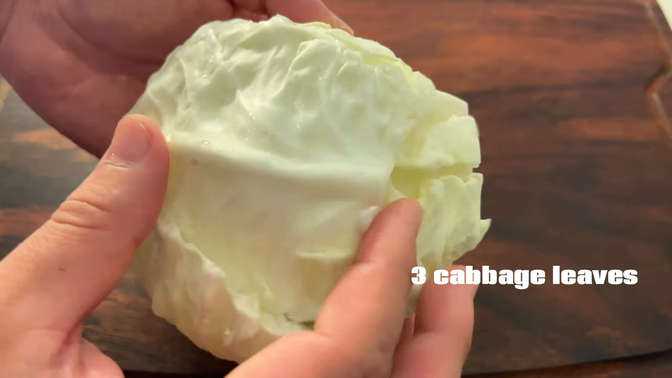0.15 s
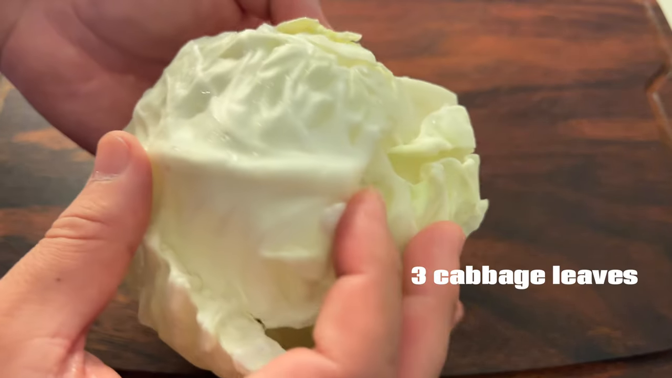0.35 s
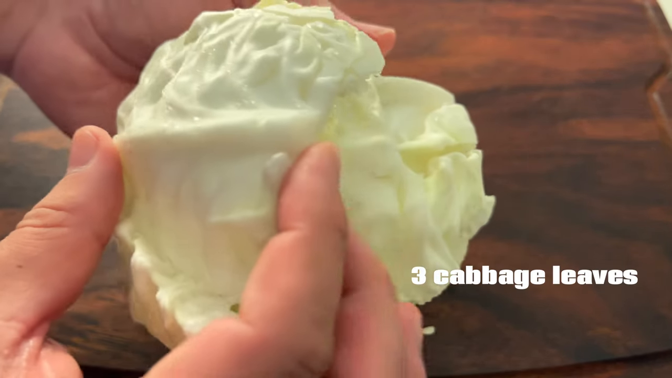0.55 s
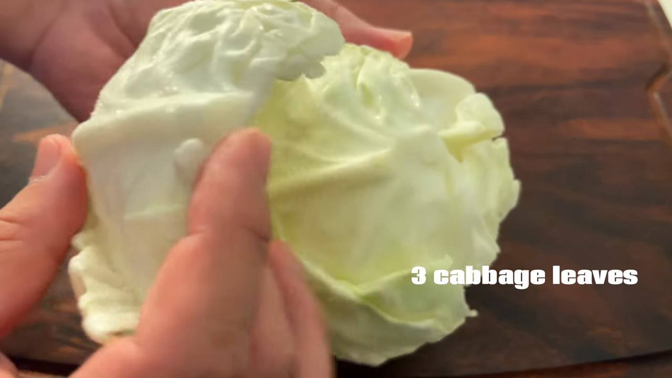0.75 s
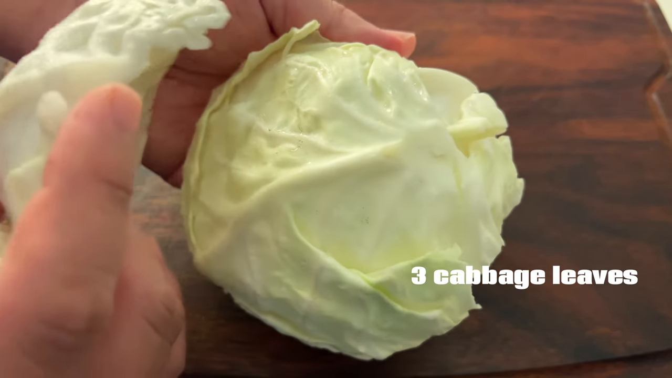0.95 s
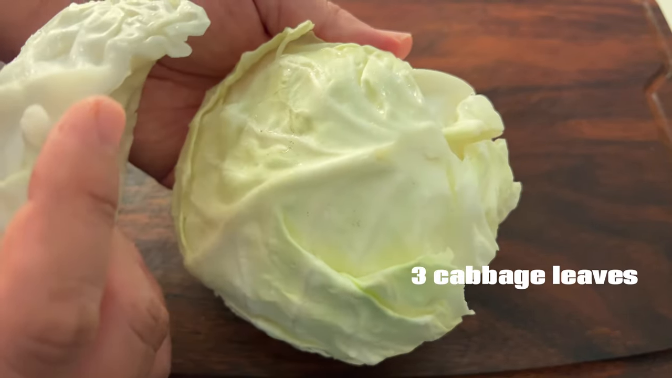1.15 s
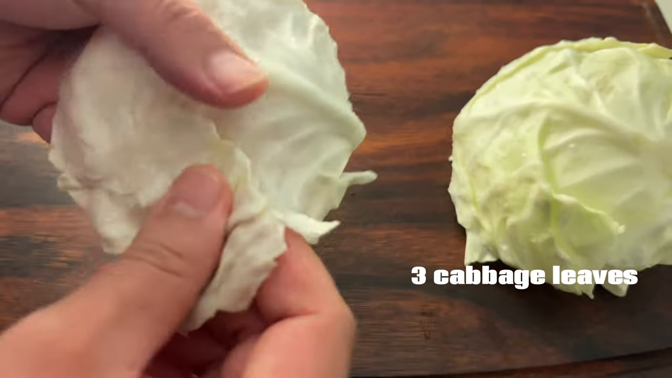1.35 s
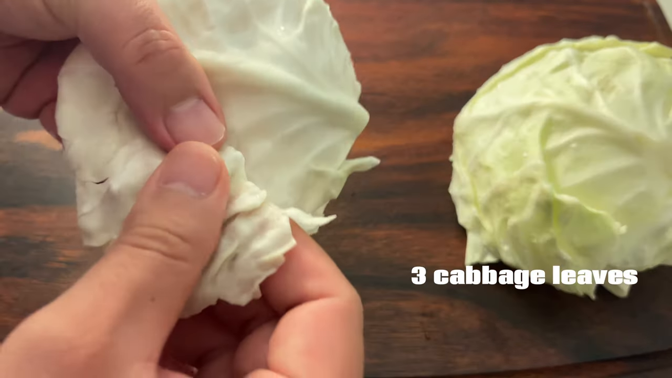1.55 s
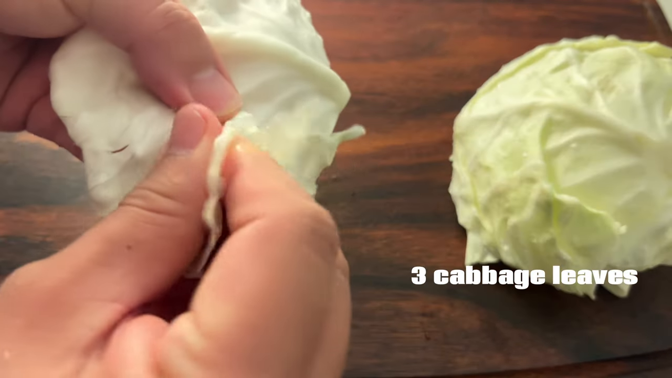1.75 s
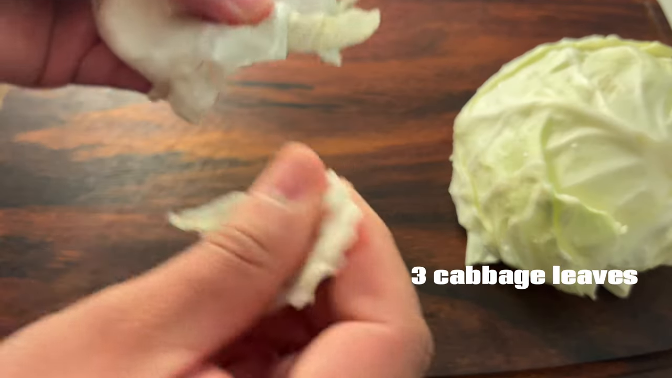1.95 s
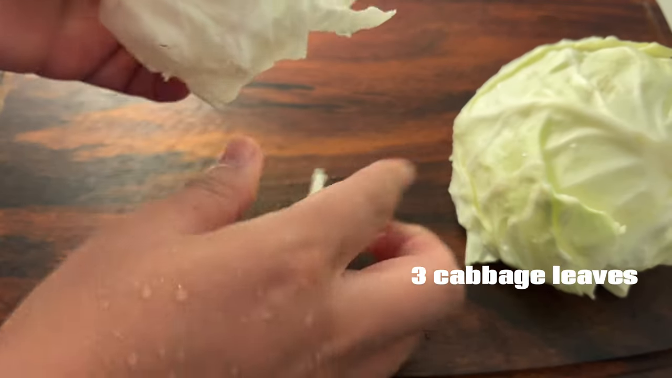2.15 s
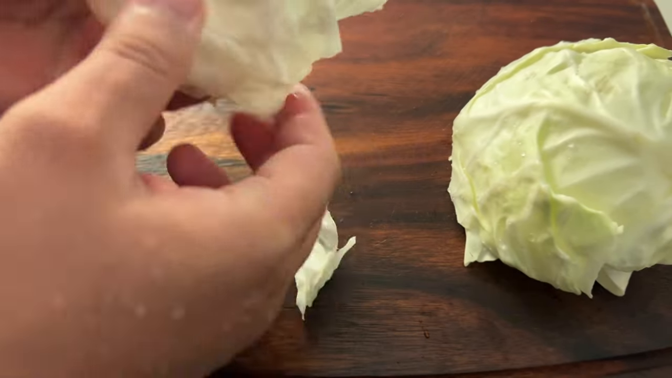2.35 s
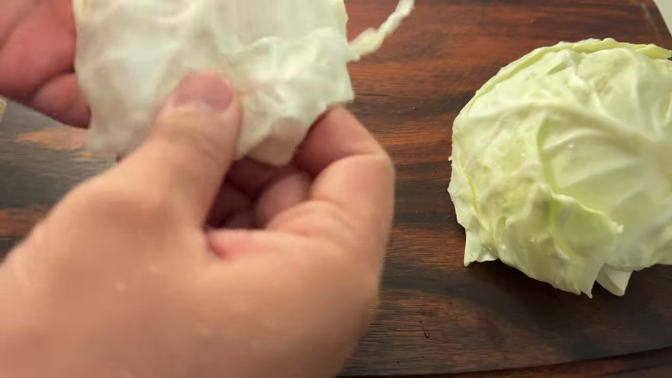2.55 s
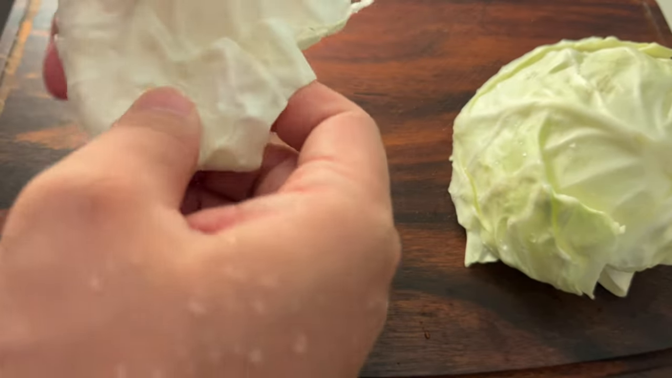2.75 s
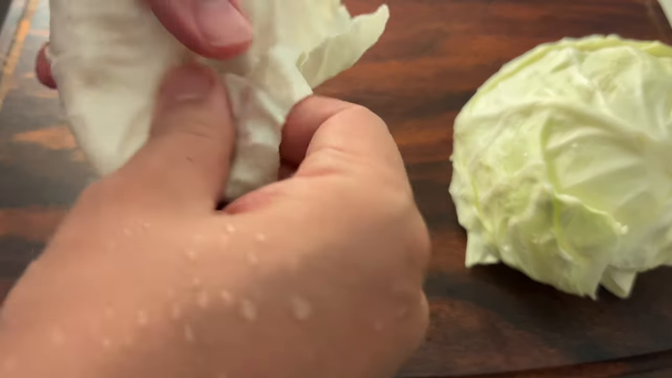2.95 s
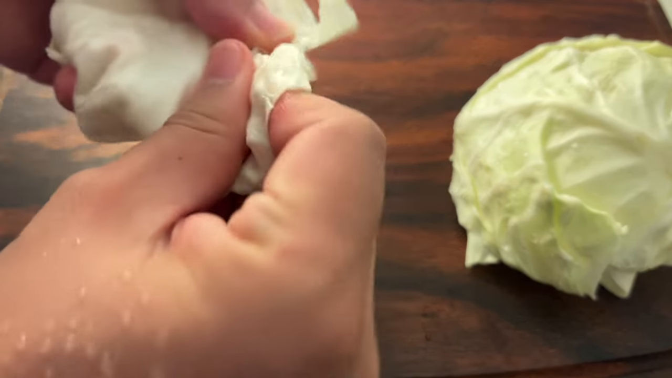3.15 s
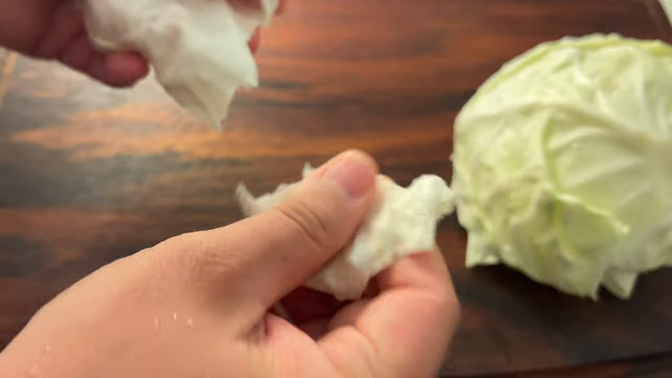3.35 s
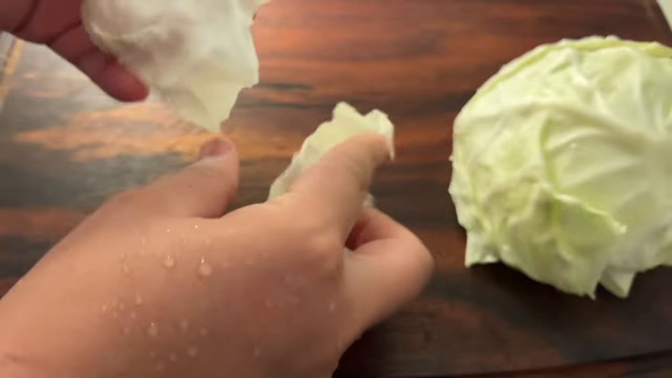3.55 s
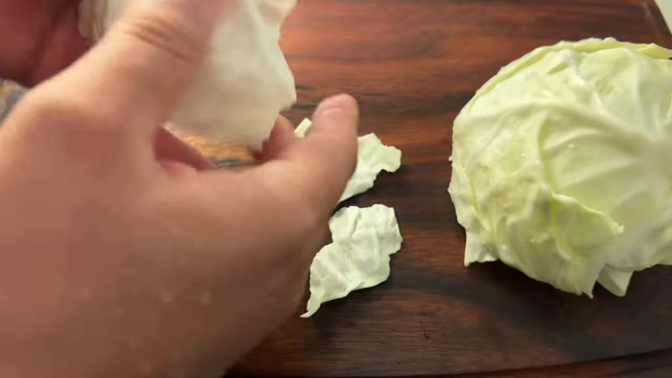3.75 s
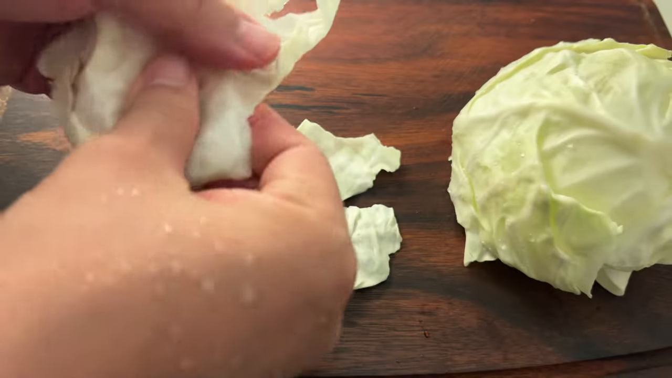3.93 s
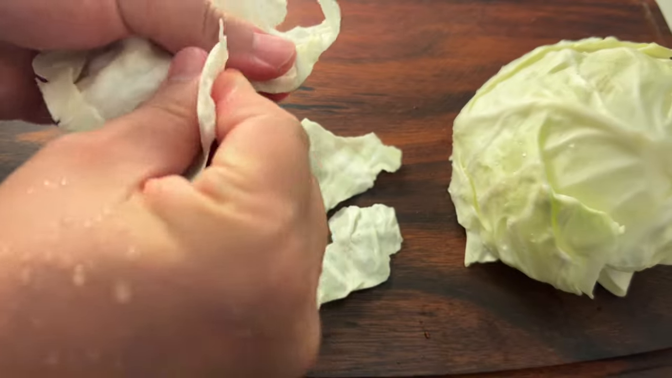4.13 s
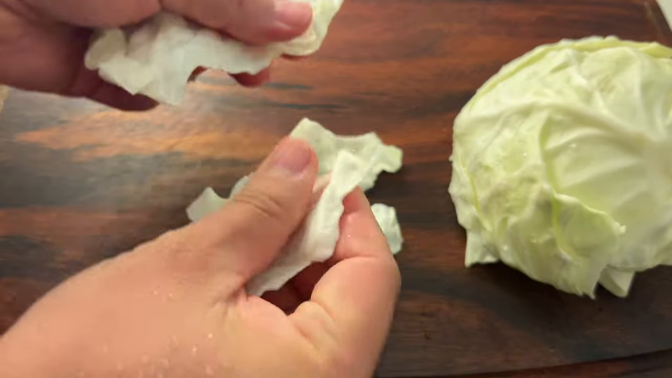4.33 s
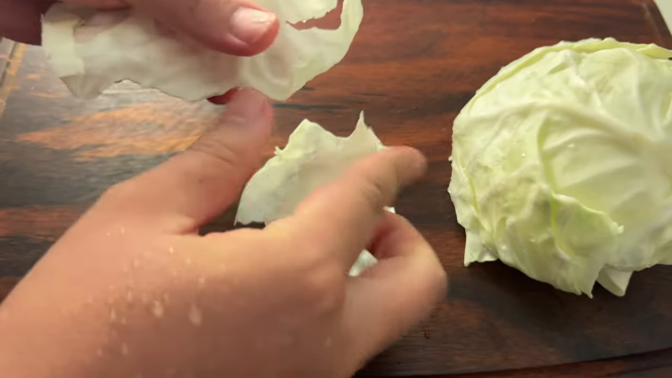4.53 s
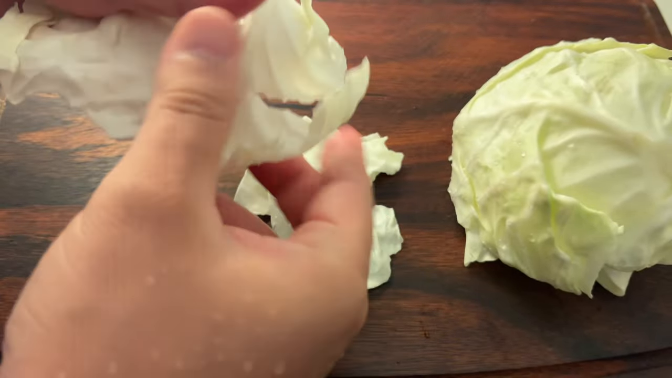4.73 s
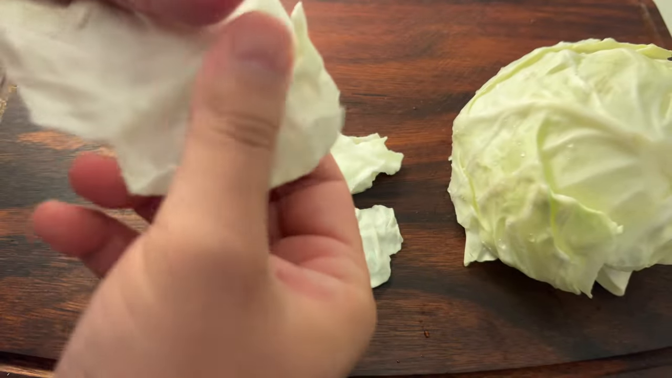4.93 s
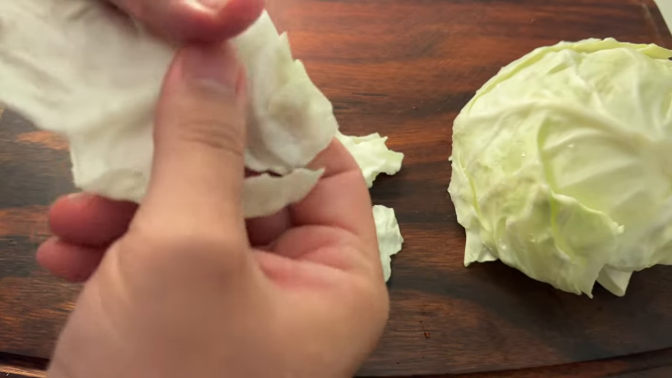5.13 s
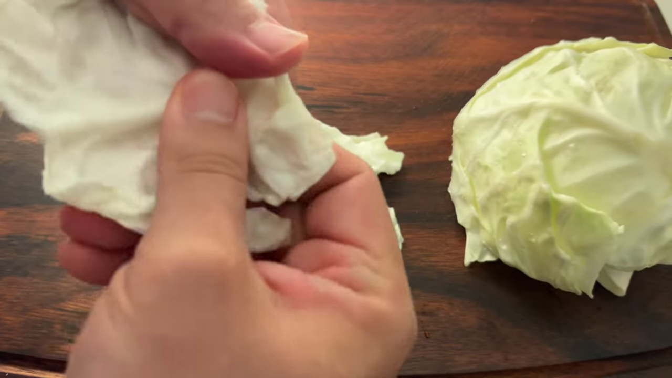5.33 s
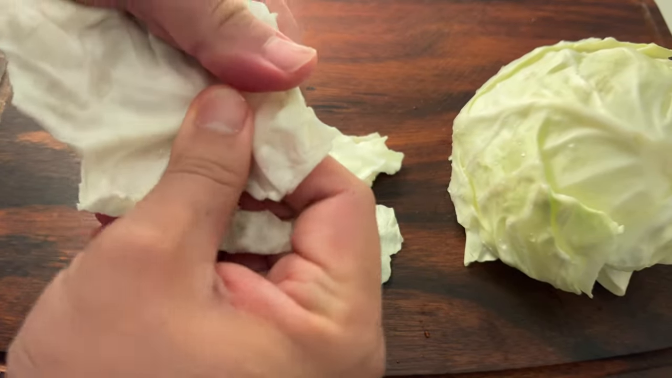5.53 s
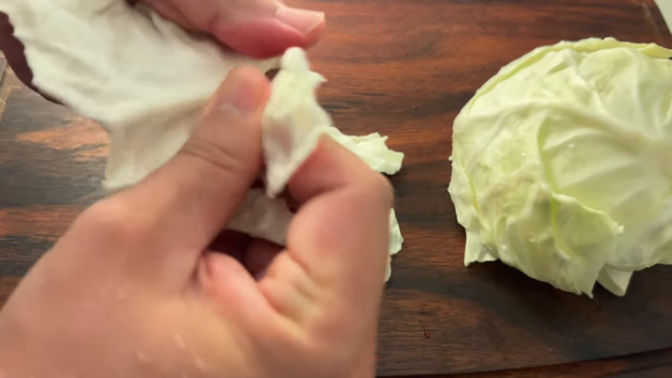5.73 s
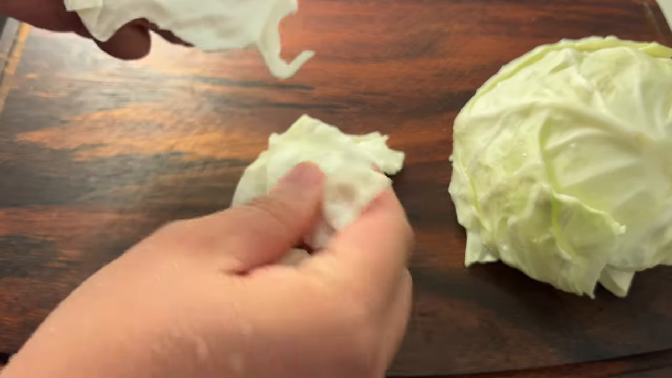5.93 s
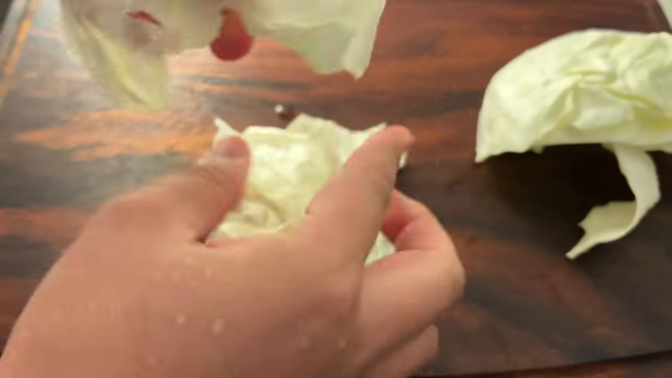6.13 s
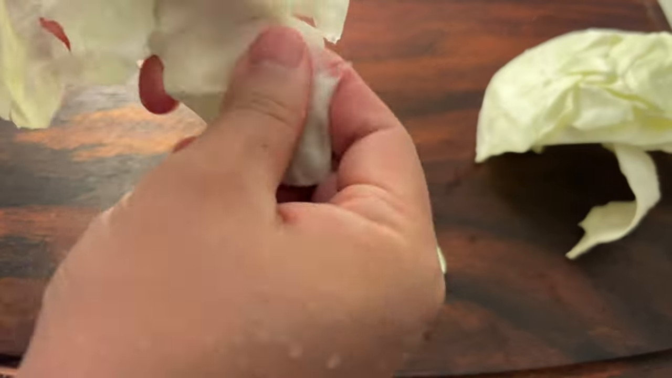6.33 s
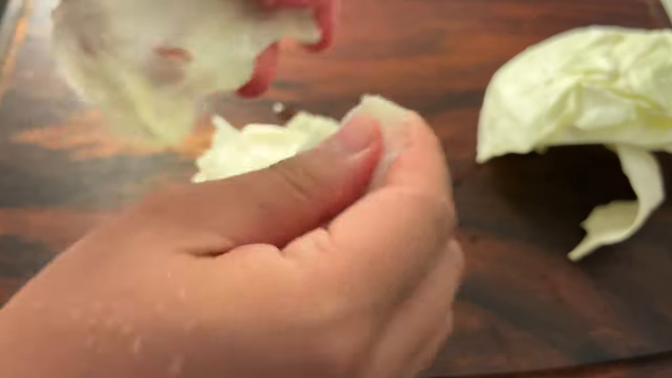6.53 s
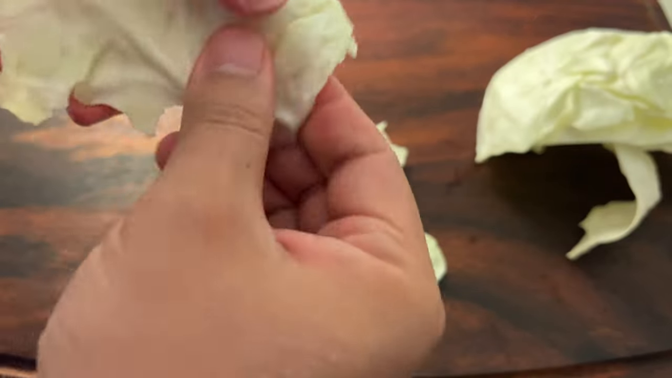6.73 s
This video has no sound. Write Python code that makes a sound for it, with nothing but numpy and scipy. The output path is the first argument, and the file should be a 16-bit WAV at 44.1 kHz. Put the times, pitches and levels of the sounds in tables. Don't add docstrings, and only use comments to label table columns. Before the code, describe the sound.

Irregular bursts of fresh leaf tearing: gentle peeling pops and a tiny squeak, a near pause, then dense crunchy rips, loud brittle snaps and dry ticks, with soft finger rustle between. Late on come two very sharp cracks, one with a dull knock on wood. Recorded very near in stereo by a phone, with a short kitchen echo, low room noise and a faint far motor drone.

```python
import sys
import numpy as np
from scipy import signal
from scipy.fft import rfft, irfft
from scipy.io import wavfile
from scipy.ndimage import uniform_filter1d

SR = 44100
rng = np.random.default_rng(int(sys.argv[2]) if len(sys.argv) > 2 else 0)


def gain_from_db(level_db):
    decades = np.asarray(level_db, float) / 20
    return 10 ** decades


def log_audio(samples):
    frames = np.atleast_2d(samples).T
    limited = np.clip(frames, -1, 1)
    pcm = np.round(limited * 32767).astype(np.int16)
    wavfile.write(sys.argv[1], SR, pcm)


N = 298998


def evened(x):
    return x / np.sqrt(np.mean(x ** 2) + 1e-20)


def read(points, hz):
    f, value = np.transpose(points)
    return np.interp(np.log(hz + 1), np.log(f + 1), value)


def curves(rows):
    s, *columns = np.transpose(rows)
    return [np.interp(np.arange(N) / SR, s, column) for column in columns]


def add(mix, s, sound):
    part = mix[round(s * SR):][:len(sound)]
    part += sound[:len(part)]


def band(x, lo_hz, hi_hz):
    sos = signal.butter(3, [lo_hz, hi_hz], "bandpass", fs=SR, output="sos")
    return signal.sosfilt(sos, x) * np.sqrt(SR / 2 / (hi_hz - lo_hz))


def house():
    # f/Hz, level/dB per Hz
    colour = [(35, -21), (52, 0.5), (110, -3), (200, -9), (400, -13), (950, -9.5), (1500, -16), (2000, -23),
              (3000, -32), (6000, -41.5), (9000, -48.5), (12900, -45.5), (13600, -85.5)]
    # f/Hz, likeness/-1 to 1
    likeness = [(60, 1), (240, 0.58), (950, -0.16), (3770, -0.036), (15000, 1)]
    # t/s, rumble level/dB, murmur level/dB
    loudness = [(0, -73.5, -65.5), (.5, -67, -56), (.85, -71.5, -61), (1.3, -67.5, -60), (1.36, -61, -57.5),
                (2.3, -65.5, -59), (3.2, -64.5, -53.5), (3.55, -66, -62.5), (5.7, -67.5, -62),
                (6.05, -73.5, -64.5), (6.78, -68.5, -65)]
    frames, hz = N // 512 + 5, np.fft.rfftfreq(2048, 1 / SR)
    a, b, c, d, patches = rng.standard_normal((frames, 1025, 5)).T
    patches = evened(uniform_filter1d(uniform_filter1d(patches, 14, 0), 8, 1))
    same = np.clip(read(likeness, hz), -1, 1)[:, None]
    left = a + 1j * b
    right = same * left + np.sqrt(1 - same ** 2) * (c + 1j * d)
    spectrum = np.array([left, right]) * gain_from_db(read(colour, hz)[:, None] + 1.9 * patches)
    rumble_share = 1 / (1 + (hz[:, None] / 130) ** 4)
    rumble, murmur = (evened(signal.istft(spectrum * share, nperseg=2048, noverlap=1536)[1][:, :N])
                      for share in (rumble_share, 1 - rumble_share))
    rumble_db, murmur_db = curves(loudness)
    return rumble * gain_from_db(rumble_db + 7.0) + murmur * gain_from_db(murmur_db - 1.5)


def strokes():
    # t/s, hold/s, crackle level/dB, low rustle over it/dB, fizz over it/dB
    tears = [(.21, 0.025, -48, -2, -6), (.39, 0.0049, -43, 1, -14), (.52, 0.0041, -45.5, -11, -15),
             (1.355, 0.045, -56, 4, -9), (1.664, 0.1, -52, -0.5, -25), (1.76, 0.04, -40, -11.5, -0.5),
             (1.83, 0.028, -39, -9.5, -15), (2.445, 0.021, -51, -5, 1.5), (2.56, .012, -47, -2.5, -5),
             (2.985, 0.07, -36.5, -11.5, -7), (3.1, 0.16, -38, -12, -6.5), (3.38, 0.02, -46, -6, 2.5),
             (4.0, 0.12, -40.5, -7, -3), (4.16, 0.082, -38.5, -5, -4), (4.835, 0.005, -58.5, 9.5, 1.5),
             (5.055, 0.0097, -52.5, -17, -21), (5.243, 0.17, -50, -24, -5), (5.325, 0.011, -39, -4.5, -1),
             (5.63, 0.018, -38.5, -6.5, -9), (5.765, 0.019, -41.5, -8, -5), (6.095, 0.012, -70.5, 8, -2.5),
             (6.585, 0.004, -57, -3, -22.5)]
    # t/s, hold/s, crackle level/dB, low rustle over it/dB, fizz over it/dB
    rubs = [(.02, 0.25, -84, 15, -11), (.6, 0.23, -60.5, 8.5, -13), (2.12, 0.019, -66.5, 4, -13),
            (2.67, 0.69, -55, -3, -17), (3.66, 0.01, -65.5, 7, -21), (3.84, 0.02, -61, 0, -16),
            (3.95, .03, -56, 3, -8), (4.4, 0.034, -61.5, -6.5, -6), (4.93, 0.1, -65, -1, -10),
            (5.44, 0.12, -61, -21, 5), (5.88, 0.11, -64.5, 0.5, -12), (6.4, 0.021, -59.5, 1.5, -10),
            (6.74, .04, -60, 1.5, -25)]
    t, power = np.arange(0, N / SR + .002, .001), 1e-14
    for rows, rise, fall in [(tears, 1301.5, 194), (rubs, 160, 97.5)]:
        s, hold, db, low, fizz = np.transpose(rows)[..., None]
        db = db - rise * np.maximum(s - t, 0) - fall * np.maximum(t - s - hold, 0)
        power = power + (gain_from_db([db, db + low, db + fizz]) ** 2).sum(axis=1)
    return [np.interp(np.arange(N) / SR, t, 10 * np.log10(p)) for p in power]


def crackle():
    db, low_db, fizz_db = strokes()
    low_db = low_db - 2.1 * np.clip((-53.5 - low_db) / 9, 0, 1)
    clumps = gain_from_db(1.6 * evened(uniform_filter1d(rng.standard_normal(N), 450)))
    out = np.zeros(N)
    layers = [(low_db - 1.0, 500, 2500, 2200), (db, 2300, 8000, 3200), (fizz_db, 8000, 16000, 2600)]
    for level_db, lo_hz, hi_hz, per_s in layers:
        sizes = gain_from_db(3.6 * np.minimum(rng.exponential(1, N), 4.5))
        clicks = sizes * (rng.random(N) < per_s / SR)
        clicks = clicks * rng.choice([-1., 1.], N) * clumps
        out += gain_from_db(level_db - 3.5) * evened(band(clicks, lo_hz, hi_hz))
    return out


def patchy(x, patchy_db):
    z = signal.stft(x, nperseg=256)[2]
    patches = rng.standard_normal(z.shape[::-1]).T
    patches = evened(uniform_filter1d(uniform_filter1d(patches, 5, 0), 14, 1))
    return signal.istft(z * gain_from_db(patchy_db * patches), nperseg=256)[1][:N]


def veins():
    # t/s, peak level/dB, centre f/Hz, decay/ms
    cores = [(1.7555, -23.5, 6900, 12), (2.836, -45, 7960, 2.8), (3.004, -26.5, 1750, 22),
             (3.976, -30.5, 910, 3.4), (4.002, -8, 7900, 2.2), (4.152, -35, 4400, 2.5),
             (4.21, -28.5, 3250, 6.8), (4.785, -54.5, 4520, 38), (5.301, -37, 2500, 3.07),
             (5.3152, -10.5, 7000, 7.3), (5.317, -15.5, 4630, 4.7), (5.325, -28.5, 6100, 56),
             (5.172, -38, 6100, 23), (5.3165, -25, 1600, 12), (5.62, -12.5, 7100, 3.5),
             (5.62, -16, 12600, 4.4), (5.626, -35, 7600, 35), (4.0022, -17.5, 4420, 2.3),
             (5.6205, -24, 1400, 4.9), (6.447, -33.5, 5560, 16), (6.4915, -40, 4770, 14),
             (6.7605, -19.5, 5400, 4.5), (4.828, -44.5, 1960, 21), (6.399, -45, 1890, 14),
             (.381, -30, 2800, 3), (1.748, -33, 900, 5), (5.318, -35, 650, 9), (6.7605, -29, 14000, 3),
             (5.62, -24, 15000, 2.5), (.168, -54, 5000, 20)]
    # t/s, peak level/dB, centre f/Hz
    pops = [(0.1695, -53, 1500), (0.3233, -50, 1500), (0.4472, -48, 1500), (0.743, -50, 1500),
            (0.8547, -58, 1900), (0.946, -58, 1500), (1.5366, -57, 1900), (1.5417, -58, 1900),
            (1.7127, -44, 2300), (1.8797, -34, 2800), (1.8888, -36, 2800), (1.9215, -41, 4100),
            (2.1711, -59, 1500), (2.401, -48, 2300), (2.411, -49, 2800), (2.4172, -52, 1900),
            (2.8498, -41, 4100), (2.956, -41, 4100), (2.9623, -41, 4100), (2.9742, -20.5, 4080),
            (2.9835, -27, 4070), (3.129, -36, 2300), (3.1877, -29, 4100), (3.2975, -36, 4090),
            (3.3725, -29, 2800), (3.6194, -51, 3400), (3.7863, -55, 2250), (3.8156, -53, 1510),
            (3.82, -51, 1500), (3.8593, -57, 3370), (3.9846, -28, 1840), (4.075, -40, 4100),
            (4.1047, -35, 4100), (4.1305, -33, 4100), (4.1667, -26, 4100), (4.2247, -24, 3400),
            (4.3528, -54, 3400), (4.442, -45, 3380), (4.6535, -51.5, 2330), (4.994, -50, 4100),
            (5.755, -33, 2500), (5.912, -62, 1900), (5.943, -58, 1890), (6.0959, -47, 2320),
            (6.3996, -38.5, 1910), (6.4907, -21.5, 4500), (6.503, -21, 4700), (6.5552, -35, 3400),
            (6.6963, -50.5, 1920), (6.7062, -52, 1930),
            (0.216, -43, 7500), (0.3673, -34, 7340), (0.4337, -37, 7600), (1.4344, -47, 5000),
             (1.6642, -30, 4930), (1.6905, -42, 5000), (1.7563, -26, 6000), (1.837, -28, 5000),
             (1.8426, -35, 7500), (1.9764, -33.5, 9000), (2.4501, -43, 7500), (2.5578, -33, 7600),
             (2.6394, -45, 4960), (2.6638, -56, 5000), (2.8162, -53, 7550), (2.8273, -50, 4990),
             (2.8559, -34, 12000), (2.8613, -35, 7500), (2.9056, -37.5, 8950), (3.0389, -32, 7500),
             (3.0644, -34, 9000), (3.158, -31, 12000), (3.3958, -29, 12000), (3.4072, -35, 7500),
             (3.455, -31, 12100), (3.913, -51, 5000), (4.1761, -35, 5000), (4.2612, -25, 6300),
             (4.282, -25, 6100), (4.3232, -44, 7500), (4.375, -53, 11800), (4.393, -55, 6100),
             (4.4608, -41, 12000), (4.4716, -44, 7500), (4.77, -54, 5020), (4.8119, -52, 8500),
             (4.909, -49, 5030), (4.9446, -54, 5030), (5.001, -48, 5000), (5.1466, -41, 7460),
             (5.273, -35, 6100), (5.2886, -38, 9000), (5.4168, -40, 5000), (5.4293, -36, 7400),
             (5.5438, -44, 5000), (5.5522, -47, 6100), (5.5804, -49, 7500), (5.5913, -55, 7500),
             (5.755, -27, 7700), (5.816, -29, 9000), (5.8592, -52, 6100), (6.0044, -31, 8900),
             (6.0741, -51, 7500), (6.1075, -50.5, 12000), (6.3902, -36.5, 11780), (6.4368, -22, 8900),
             (6.4545, -27, 5600), (6.5958, -41, 7450)]
    tick_ms, spread = 2, 1.367
    t, out = np.arange(1500) / SR, np.zeros((2, N))
    rows = cores + [(*row, tick_ms) for row in pops]
    for (s, db, hz, ms), noise in zip(rows, rng.standard_normal((len(rows), 2, 1500))):
        shape = (1 - np.exp(-t / (ms * .00006))) * gain_from_db(-60 * t / (ms * 0.0045))
        burst = band(noise * shape, hz / spread, min(hz * spread, 16000))
        burst = burst / abs(burst).max(-1, keepdims=True) * gain_from_db(db + 1.5)
        add(out[0], s, burst[0])
        add(out[1], s, burst[1])
    return out + gain_from_db(-8.5) * room(out[0])


def snaps():
    # t/s, peak level/dB, thickness/dB, decay/ms
    stalk = [(0.2215, -39, 3, 4), (0.3813, -33, -2.5, 4.9), (0.4032, -41.5, 5.5, 3), (0.6385, -48.5, 4, 14),
             (0.659, -39, 0, 5.9), (1.349, -49.5, 13.5, 11), (1.662, -35, -4.5, 4.5), (1.7662, -36, 4, 3.1),
             (1.8004, -38.5, 2.5, 5.7), (1.811, -32, 2, 3), (2.5404, -38, 1, 5.5), (2.557, -49.5, 5.5, 17),
             (2.7, -46, 2, 9), (2.7582, -50.5, 10, 2.5), (2.989, -28.5, -6.5, 5), (3.651, -60, 13, 5.3),
             (3.915, -42, -2, 95), (3.9761, -20.5, -6.5, 1.9), (4.0019, -9, -18.5, 2.2),
             (4.7755, -53.5, 2, 13), (4.825, -44, 0, 14.5), (4.861, -60, 18, 1.8), (5.2428, -42.5, -9, 4.8),
             (5.7703, -23, -17, 0.9), (5.8025, -29.5, -16, 3.9), (6.0803, -48, -8, 12.7),
             (6.447, -32, -2.5, 12), (6.697, -63, 13, 9.5), (6.76, -27.5, -10, 2.7)]
    # t/s, peak level/dB, thickness/dB, decay/ms
    ribs = [(0.358, -45.5, 1, 20), (0.505, -40.5, 1, 8.1), (0.8763, -42.5, 3, 8.6), (1.7468, -19.5, -4, 4),
            (1.835, -43, 0, 4.9), (1.878, -34, -8, 4), (1.9217, -43, -21, 2), (2.843, -40.5, -8, 5.4),
            (2.9735, -28.5, -1.5, 2.6), (3.002, -23, -1, 6), (3.0376, -38, -2, 12), (3.047, -27.5, -9, 21),
            (3.128, -42, -19, 5.6), (3.4052, -46, 3, 6.7), (4.101, -36, 2.5, 17), (4.1588, -25, -0.5, 1.5),
            (4.1995, -30, -2, 9), (4.2375, -20, -6.5, 3), (4.2709, -28.5, -6, 5), (4.2812, -39, -7, 6.2),
            (4.4112, -46, -15, 5.2), (4.4434, -49, -7.5, 20), (4.914, -45.5, -14, 9.2),
            (5.0559, -42.5, -4, 12), (5.294, -33, -8, 4.9), (5.316, -20, -2.5, 4.7), (5.429, -49, -12, 3.3),
            (5.62, -17, -5.5, 3.3), (5.754, -31, -4.5, 4.9), (6.399, -38, -8, 4.5)]
    # t/s, peak level/dB, thickness/dB, decay/ms
    edges = [(0.186, -48, 2, 4.2), (1.9732, -47.5, -26, 27), (2.1, -49.5, -20, 5.1),
             (2.4404, -30, -12, 1.3), (2.639, -53, -18, 3.7), (2.862, -43.5, -6, 28),
             (2.9544, -47, -14.5, 3.9), (3.0651, -25, -8, 3.5), (3.0777, -22, -8, 1.7),
             (3.142, -31, -18, 3), (3.365, -38, 4, 7.1), (3.3875, -38, -8, 3), (3.451, -50, -15, 11),
             (4.031, -26.5, -16, 2.4), (4.074, -41, -10, 11), (5.1306, -54, -6, 6.9),
             (5.1679, -23, -10, 1.6), (5.462, -45.5, -9, 2.7), (5.496, -36, -3, 3), (5.85, -41.5, -12, 3),
             (5.9922, -41, -4.5, 12.6), (6.429, -41, -10, 4), (6.435, -30.5, -1, 6.4)]
    # t/s, peak level/dB, thickness/dB, decay/ms
    folds = [(.601, -45, 4, 6.2), (1.702, -33.5, -7, 3.4), (2.398, -51.5, -1, 30), (2.7187, -51, -13, 5),
             (3.1745, -25, 1, 1.7), (3.202, -33, -8, 5.2), (3.237, -29.5, -9, 7.2), (3.27, -33.5, -7, 6.8),
             (3.8454, -40.5, -18, 2.9), (4.653, -71.5, 14, 11), (5.0343, -41.5, -6.5, 9.3),
             (6.253, -51.5, 5.5, 3.8), (6.304, -51, -11, 16), (6.491, -26, -20, 2.8),
             (6.5015, -36, -5, 4.3), (6.552, -45.5, -4, 17), (6.568, -37, -10, 16), (6.747, -43.5, -33, 6)]
    # thud over thickness/dB, body over thickness/dB, fizz over crack/dB
    kinds = [
        (-0.44, -2, -4),
        (-8, 0, -1),
        (-12.5, -0.1, 7),
        (-9.5, -0.8, -10.5),
    ]
    # lowest f/Hz, highest f/Hz
    parts = [
        (400, 1036),
        (1200, 3600),
        (2700, 7620),
        (8000, 14250),
    ]
    t, out = np.arange(1500) / SR, np.zeros((2, N))
    rows = [row + kind for table, kind in zip([stalk, ribs, edges, folds], kinds) for row in table]
    s, db, thick, ms, thud, body, fizz = np.transpose(rows)[..., None]
    thud, body = thick + thud, thick + body
    noise = rng.standard_normal((len(rows), 4, 2, 1500))
    rise = 0.000067 + .000025 * ms ** 2
    for k, (rel_db, stretch) in enumerate([(thud - 3.0, 1.8), (body, 1.3), (0, 1), (fizz, .7)]):
        shape = (1 - np.exp(-t / rise)) * gain_from_db(-60 * t / (np.maximum(ms, 1) * 0.0034 * stretch))
        bursts = band(noise[:, k] * shape[:, None], *parts[k])
        bursts = bursts / abs(bursts).max(-1, keepdims=True) * gain_from_db(db + rel_db + 3.0)[:, None]
        for at, pair in zip(s[:, 0], bursts):
            add(out[0], at, pair[0])
            add(out[1], at, pair[1])
    return out


def rings():
    # t/s, peak level/dB, f/Hz, time to fall 60 dB/s
    cups = [
        (.525, -33.5, 2320, 0.056),
        (2.717, -27, 7500, 0.022),
        (3.651, -44.5, 600, 0.15),
        (4.827, -46, 1990, 0.12),
        (6.4892, -26, 4370, 0.014),
        (6.503, -41, 4600, 0.027),
        (6.568, -39.5, 2750, 0.067),
    ]
    t, out = np.arange(3000) / SR, np.zeros(N)
    for (s, db, hz, t60), noise in zip(cups, rng.standard_normal((len(cups), 3000))):
        add(out, s, gain_from_db(db - 4.5 - 60 * t / t60) * band(noise, hz / 1.21, hz * 1.05))
    return out


def board():
    # t/s, peak level/dB, f/Hz, time to fall 60 dB/s
    thumps = [
        (5.22, -40.5, 140, 0.075),
        (5.619, -31, 262, 0.032),
        (5.62, -43, 202, 0.045),
        (5.625, -49, 101, 0.12),
        (5.243, -47, 105, 0.07),
    ]
    # start t/s, end t/s, f/Hz, level/dB
    squeaks = [
        (.725, 0.845, 1530, -57),
        (5.848, 6.0, 2008, -70),
        (5.85, 5.97, 1540, -68),
        (5.84, 5.97, 770, -67),
        (5.92, 6.0, 1007, -73),
    ]
    out, t = np.zeros((2, N)), np.arange(8000) / SR
    for s, db, hz, t60 in thumps:
        turns = hz * (t + .0008 * (1 - np.exp(-t / .01)))
        swell = (1 - np.exp(-t * hz / .6)) ** 2
        lean_db = 4 * np.clip(hz / 150 - 1, 0, 1)
        thump = gain_from_db(db + 10.5 - 60 * t / t60) * swell * np.sin(2 * np.pi * turns)
        add(out[0], s, gain_from_db(lean_db) * thump)
        add(out[1], s, gain_from_db(-lean_db) * thump)
    for start, end, hz, db in squeaks:
        u = np.arange(0, end - start, 1 / SR)
        squeak = gain_from_db(db) * signal.windows.tukey(len(u), .4) * np.sin(2 * np.pi * hz * u)
        for side in out:
            add(side, start, squeak)
    return out


def drone():
    # t/s, firing f/Hz, level/dB
    engines = [
        [(1.33, 124.2, -41.5), (1.5, 122.3, -51), (1.7, 107.6, -56.5), (2.0, 92.9, -58.5), (2.25, 89, -62)],
        [(1.33, 53, -54), (1.47, 51.3, -50), (1.58, 51, -60), (1.85, 48.7, -68)],
        [(2.33, 121.1, -59), (2.65, 119.5, -62.5), (2.77, 120.1, -52.5), (2.9, 120, -61), (3.15, 122.3, -60),
         (3.27, 121.3, -53.5), (3.5, 111.4, -72)],
        [(3.7, 107.3, -63), (4.1, 110.9, -63.5), (4.95, 104.3, -65.5), (5.4, 105.8, -58)],
        [(5.28, 175, -65), (5.45, 192, -74), (6.0, 194.5, -74)],
    ]
    out, t = np.zeros((2, N)), np.arange(N) / SR
    waver = evened(uniform_filter1d(uniform_filter1d(rng.standard_normal((2, N)), 2500), 2500))
    swell_db, drift_hz = 1.7 * waver[0], 1.5 * waver[1]
    for rows in engines:
        hz, db = curves(rows)
        fade_in = np.clip((t - rows[0][0]) / 0.066, 0, 1)
        fade_out = np.clip((rows[-1][0] - t) / 0.076, 0, 1)
        turns = np.cumsum(hz + drift_hz) / SR + np.outer([0, .0009], hz)
        tone = np.sin(2 * np.pi * turns) + gain_from_db(-17) * np.sin(4 * np.pi * turns)
        out += fade_in * fade_out * gain_from_db(db + 5.0 + swell_db) * tone
    return out


def creak():
    s, slips_hz, db, t60 = 4.826, 482, -42, .16
    partials_db = [-6, -11, -8, 0]
    t, out = np.arange(8000) / SR, np.zeros(N)
    stack = sum(gain_from_db(p) * np.sin(2 * np.pi * (k + 1) * slips_hz * t) for k, p in enumerate(partials_db))
    add(out, s, np.minimum(t / .008, 1) * gain_from_db(db - 60 * t / t60) * stack)
    return out


def room(x):
    # f/Hz, time to fall 60 dB/s
    ring_times = [(250, 0.08), (700, 0.13), (1800, 0.15), (5000, 0.12), (12000, 0.057)]
    out, count = np.zeros(N), SR // 40
    for k in range(3):
        echoes = np.zeros(SR // 2)
        places = 130 + 16 * np.arange(count) + rng.integers(0, 16, count)
        echoes[places] = rng.choice([-1., 1.], count)
        hz, t, z = signal.stft(echoes, SR, nperseg=128)
        tail = signal.istft(z * gain_from_db(-60 * t / read(ring_times, hz)[:, None]), SR, nperseg=128)[1]
        turn = np.sqrt(2 / 3) * np.cos(2 * np.pi * (3.1 * np.arange(N) / SR + k / 3))
        out += signal.oaconvolve(x * turn, tail / np.linalg.norm(tail))[:N]
    return out


def leaves():
    tissue = patchy(crackle(), patchy_db=4.3) + rings() + creak()
    scatter = rng.standard_normal(300) * gain_from_db(-np.arange(300) / 12)
    scattered = signal.oaconvolve(tissue, scatter / np.linalg.norm(scatter))[:N]
    near, other = snaps() + [tissue, scattered]
    wet = gain_from_db(-7.5)
    return np.array([near + wet * room(near), other + wet * room(near)])


def ports(near, other):
    # t/s, left minus right/dB
    sideways = [(0.0, .5), (1.0, 1.8), (2.5, 3.5), (4.79, 5), (6.78, 6)]
    # f/Hz, level/dB
    leaf_colour = [(200, 14.5), (500, -5.5), (900, 3.5), (1600, 5), (3000, -2.5), (8000, -3.5),
                   (10000, -3.5), (13000, -2.5), (15900, -7), (16250, -34)]
    # f/Hz, lead/radians
    lead = [(250, 0), (600, 1.3), (1700, 3.2), (3400, 3.7), (4600, 6.2), (8300, 7.3), (10100, 3.2),
            (11850, 0), (15300, -6.3)]
    # f/Hz, likeness/0 to 1
    alike = [(130, .9), (400, .45), (1700, .6), (3000, .35), (4500, .55), (6000, .2), (8000, .55),
             (9000, .86), (16000, .92)]
    # f/Hz, factor/1
    tilt = [(150, 0), (300, 1.3), (1500, .7), (3000, 1.1), (7500, 1.1), (8800, .3)]
    hz = np.fft.rfftfreq(N, 1 / SR)
    same = read(alike, hz)
    half_lead = np.exp(.5j * np.interp(hz, *np.transpose(lead)))
    a, b = rfft(near), rfft(other)
    left = a * half_lead
    right = (same * a + np.sqrt(1 - same ** 2) * b) / half_lead
    pair = np.array([left, right]) * gain_from_db(read(leaf_colour, hz))
    lean = gain_from_db(np.outer([.5, -.5], curves(sideways)[0])) - 1
    return irfft(pair, N) + lean * irfft(pair * read(tilt, hz), N)


def scene():
    leaf = leaves() + veins()
    kitchen = house() + drone() + board()
    return ports(*leaf) + kitchen


def band_limit(x):
    return signal.sosfilt(signal.butter(12, 16750, fs=SR, output="sos"), x)


def record(dry):
    return band_limit(dry)


dry = scene()
out = record(dry)
log_audio(out)
```